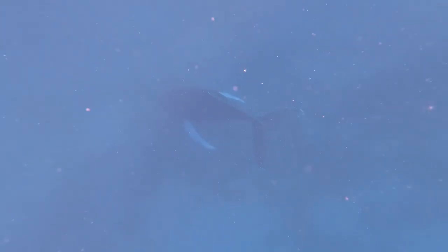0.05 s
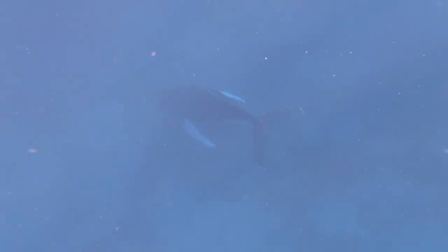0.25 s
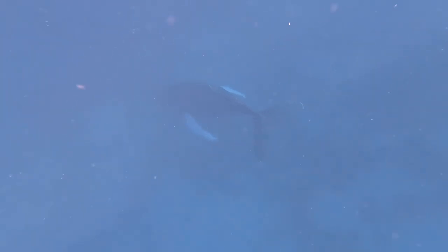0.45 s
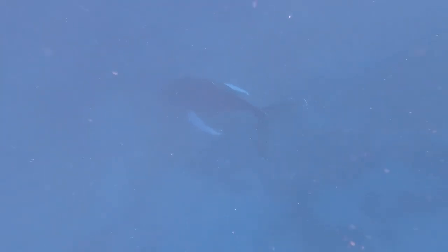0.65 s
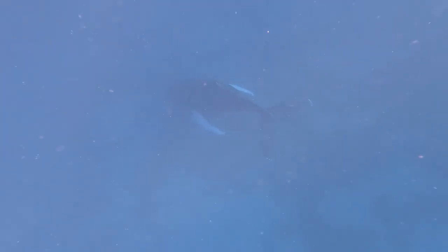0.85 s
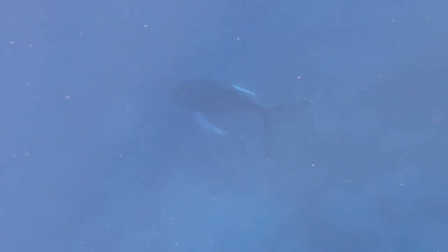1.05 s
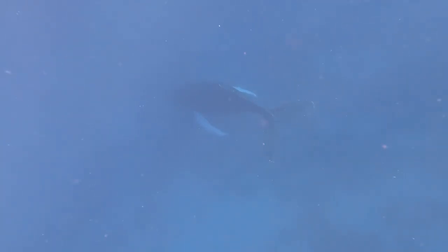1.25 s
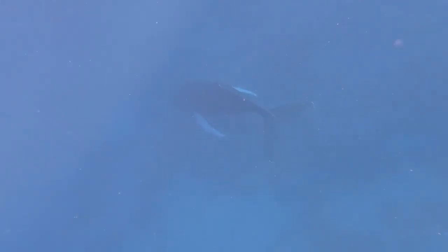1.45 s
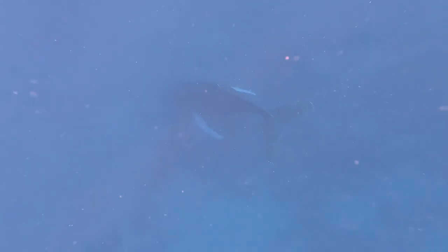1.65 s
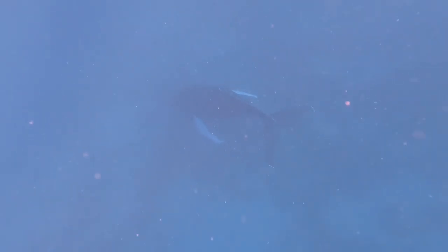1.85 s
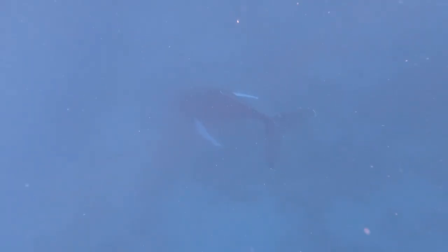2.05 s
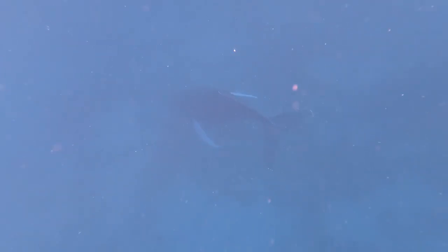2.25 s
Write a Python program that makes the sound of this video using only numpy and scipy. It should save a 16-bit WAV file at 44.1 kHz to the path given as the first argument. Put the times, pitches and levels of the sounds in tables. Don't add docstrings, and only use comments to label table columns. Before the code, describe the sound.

A whale's low buzzing moan swells and sags underwater amid bubble pings and soft rumble

```python
import sys
import numpy as np
from scipy import signal
from scipy.io import wavfile
from scipy.ndimage import uniform_filter1d

SR = 44100
rng = np.random.default_rng(int(sys.argv[2]) if len(sys.argv) > 2 else 0)


def to_wav(s):
    ch = np.atleast_2d(s).T
    pcm = np.round(np.clip(ch, -1, 1) * 32767)
    wavfile.write(sys.argv[1], SR, pcm.astype(np.int16))


def volts_from_decibels(level):
    exponent = np.asarray(level, float) / 20
    return 10 ** exponent


N = 101429

# frequency in Hz, width in Hz, level in dB.
HOUSING = [(250, 184, 5.5), (650, 270, -2), (1150, 393, -2.5), (1510, 240, 3.5), (1950, 950, -24),
           (2680, 890, -27.5), (3520, 290, -17.5), (4200, 210, -25.5), (6900, 1500, -57.5)]


def curve(table, col):
    rows = np.array(table)
    return np.interp(np.arange(N) / SR, rows[:, 0], rows[:, col])


def unit(x):
    return x / np.sqrt(np.mean(x ** 2))


def even(x):
    return x / np.sqrt(uniform_filter1d(x ** 2, size=5000) + 1e-12)


def walk(rate):
    k = int(SR / rate)
    steps = np.repeat(rng.standard_normal(N // k + 1), k)
    return unit(uniform_filter1d(uniform_filter1d(steps, k), k)[:N])


def ring(x, hz, width):
    b, a = signal.iirpeak(hz, hz / width / 1.48, fs=SR)
    return signal.lfilter(b, a, signal.lfilter(b, a, x))


def band(x, low_hz, high_hz):
    return signal.sosfilt(signal.butter(4, [low_hz, high_hz], "band", fs=SR, output="sos"), x)


def add(out, s, grain):
    i = int(s * SR)
    out[i:i + len(grain)] += grain[:N - i]


def bubble(db, hz, t60, rise=0., attack=0.00048):
    t = np.arange(int(t60 * SR)) / SR
    cycles = np.cumsum(hz * 2 ** (rise * t)) / SR
    return volts_from_decibels(db - 60 * t / t60) * (1 - np.exp(-t / attack)) * np.sin(2 * np.pi * cycles)


def housing(x):
    return sum(volts_from_decibels(db) * ring(x, hz, w) for hz, w, db in HOUSING)


def wash(surge_db):
    out = np.zeros(N)
    for hz, width, db in HOUSING:
        surge = 0.34 * (hz < 400) * surge_db
        flicker = 2.0 * walk(12) + 0.0004 * hz * walk(25)
        out += volts_from_decibels(db + surge + flicker) * ring(rng.standard_normal(N), hz, width)
    return unit(out)


def fizz():
    per_s, spread_db = 410, 3
    out = np.zeros(N)
    for when, size, level, damping in rng.random((int(per_s * 2.0), 4)):
        hz = 1900 * 2 ** (2.0 * size)
        t60 = (15 + 40 * damping) / hz
        add(out, when * N / SR, bubble(-spread_db * np.log(level + 0.1), hz, t60, 1.7, 0.00057))
    return unit(housing(out))


def crackle():
    chance = 180 * volts_from_decibels(3.3 * walk(15)) / SR
    out = np.zeros(N)
    for hz, width, db in HOUSING[2:]:
        clicks = (rng.random(N) < chance) * rng.standard_normal(N)
        out += volts_from_decibels(db) * ring(clicks, hz, width * 1.19)
    return unit(out)


def sea():
    # time in seconds, level of the noise in dB, surge of the rumble in dB.
    water_course = [(0, -50.5, -2), (.15, -52, -1.5), (.3, -49.5, 0.5), (.52, -43.5, -2.5), (.7, -46.5, 0),
                    (1.0, -52, -2), (1.3, -59.5, -2.5), (1.45, -51, 3), (1.8, -55, 4), (1.95, -50.5, -5),
                    (2.05, -46.5, -12.5), (2.2, -53, -1), (2.3, -47, 8)]
    water_db, surge_db = uniform_filter1d(curve(water_course, 1), 2000), curve(water_course, 2)
    water = volts_from_decibels(13) * wash(surge_db) + volts_from_decibels(9.5) * fizz() + volts_from_decibels(6) * crackle()
    rumble = unit(band(rng.standard_normal(N), 18, 57.5))
    return volts_from_decibels(water_db) * water + volts_from_decibels(-40.5 + surge_db + 3.4 * walk(7.2)) * rumble


def pings():
    # start in seconds, peak in dB, frequency in Hz, decay in seconds.
    small = [(0.016, -22, 916, 0.045), (0.163, -26, 1500, 0.054), (0.205, -10.5, 1610, 0.0083),
             (0.221, -15.5, 1240, 0.04), (0.27, -16.5, 1650, 0.041), (0.288, -15, 1374, 0.02),
             (0.357, -25.5, 1470, 0.02), (0.398, -19.5, 1590, 0.022), (.42, -13, 1700, 0.011),
             (.435, -11.5, 1670, 0.023), (0.451, -17, 1650, 0.03), (.497, -15.5, 1584, 0.044),
             (.506, -18, 1587, .04), (0.513, -10.5, 1600, 0.018), (0.519, -16.5, 1270, 0.031),
             (0.547, -21.5, 1950, 0.026), (0.58, -24.5, 1532, 0.12), (.605, -16, 1547, 0.033),
             (0.644, -15, 2016, 0.031), (0.7, -21.5, 1433, 0.05), (0.76, -26, 1510, 0.056),
             (0.849, -17, 2006, 0.021), (1.659, -26, 1700, 0.037), (.412, -18.5, 1920, 0.032),
             (1.995, -18, 1520, 0.056), (2.014, -16.5, 1200, 0.025), (2.02, -21, 1866, 0.044),
             (2.043, -16.5, 1636, 0.036), (2.053, -22, 1573, 0.033), (2.062, -13.5, 1585, 0.019),
             (2.096, -32.5, 1630, .03), (.093, -27.5, 1600, .04), (1.76, -31, 1990, 0.021),
             (1.943, -28.5, 1950, 0.038), (2.081, -19, 1623, 0.03), (0.466, -15.5, 1500, 0.01),
             (2.274, -25, 1690, 0.018)]
    out, ticks = np.zeros((2, N))
    for s, db, hz, t60 in small:
        add(out, s, bubble(db + 4, hz, t60, 3.5, 0.0012))
        add(out, s, bubble(db - 5.0, hz * 1.13, t60 * 0.9))
        add(ticks, s, volts_from_decibels(db) * rng.standard_normal(180) * np.hanning(180))
    return out + volts_from_decibels(-1) * housing(ring(ticks, 2900, 2700))


def glints():
    # start in seconds, peak in dB, frequency in Hz.
    grains = [(0.2044, -30, 3360), (0.2796, -38, 3650), (0.2942, -34, 3830), (0.3713, -33.5, 3710),
              (0.4394, -34.5, 3640), (0.4798, -34, 3400), (0.5072, -26, 3600), (0.533, -26, 3300),
              (0.6517, -37.5, 3840), (0.7836, -42, 3630), (1.0705, -33.5, 3500), (1.218, -40.5, 3480),
              (1.4305, -41, 3270), (1.4852, -42, 3460), (1.716, -37, 3621), (1.761, -38, 3450),
              (1.9285, -35, 3500), (1.982, -40.5, 3870), (2.0175, -33.5, 3560), (2.0522, -32, 3360),
              (2.0817, -35, 3570), (2.1096, -40, 3860), (2.1226, -35, 3730), (2.1485, -40, 3680),
              (2.2284, -42, 3560), (2.2636, -35, 3500)]
    # start in seconds, peak in dB, frequency in Hz.
    highest = [(0.0174, -65, 6160), (0.0493, -52, 6600), (0.1012, -62, 6710), (0.2057, -66, 6920),
               (0.314, -54, 6130), (0.3716, -60, 6240), (0.4707, -60, 6340), (0.596, -61, 6640),
               (0.6115, -52, 7010), (0.6783, -58, 7000), (0.7088, -54, 6960), (0.8185, -60, 6110),
               (0.8903, -49.5, 6770), (1.062, -61, 6550), (1.5464, -54, 6970), (1.5982, -56.5, 6760),
               (1.775, -57, 6920), (1.9886, -47.5, 6310)]
    out, snaps = np.zeros((2, N))
    for table, gain_db, cycles in ((grains, 4, 56), (highest, 9, 76)):
        for s, db, hz in table:
            add(out, s, bubble(db + gain_db, hz, cycles / hz, -3.0))
            add(snaps, s, volts_from_decibels(db + 2) * rng.standard_normal(110) * np.hanning(110))
    return out + band(snaps, 2500, 4700)


def specks():
    # start in seconds, peak in dB, frequency in Hz.
    tiny = [(0.2062, -19.5, 2555), (0.282, -32, 2590), (0.373, -35.5, 2580), (0.421, -24.5, 3540),
            (0.514, -20, 2680), (0.5964, -25.5, 2640), (0.6465, -30.5, 2760), (0.7148, -32, 3620),
            (0.7686, -28.5, 2490), (1.5695, -30.5, 2620), (1.8514, -39, 2680), (1.9415, -28, 2960),
            (2.0165, -39, 3090), (2.214, -34, 2780), (2.255, -20.5, 2540)]
    out = np.zeros(N)
    for s, db, hz in tiny:
        add(out, s, bubble(db + 3.5, hz, 62 / hz, -4.0))
    return out


def knocks():
    # start in seconds, peak in dB, frequency in Hz, decay in seconds,
    # rise in octaves per second.
    big = [(0.5144, -12.5, 129, 0.015, -28), (0.362, -24.5, 43.8, 0.028, 1), (0.439, -29.5, 1150, 0.17, 5),
           (1.599, -35.5, 301, 0.096, 10.5), (1.675, -32.5, 374, 0.036, 12), (1.721, -21.5, 310, 0.018, 13),
           (1.766, -13.5, 305, 0.02, 29), (1.827, -25, 322, 0.035, 9), (1.903, -32, 120.3, 0.26, 15.5),
           (1.901, -26.5, 250, 0.095, 1), (1.912, -28, 357, 0.079, -0.5), (2.281, -30, 650, 0.041, 3.5)]
    out = np.zeros(N)
    for s, db, hz, t60, rise in big:
        add(out, s, bubble(db + 8.0, hz, t60, rise, 0.0018))
        add(out, s, bubble(db - 5, hz / 2.3, min(t60 * 3, .13), rise, 0.0043))
    return out


def far_whales():
    # start in seconds, length in seconds, first pitch in Hz, last pitch in Hz,
    # level in dB.
    glides = [(0.213, 0.29, 250, 240.5, -52), (0.417, 0.092, 250, 312, -34.5),
              (0.507, 0.08, 573.5, 702, -32), (0.549, 0.096, 633, 589, -33), (.69, .1, 810, 815, -38.5),
              (1.56, 0.15, 176, 133, -42), (0.663, 0.19, 563, 579, -37.5), (0.79, 0.13, 640, 610, -34.5),
              (1.388, 0.097, 343, 273, -26), (1.514, 0.073, 254.4, 302, -33.5),
              (1.517, 0.069, 720, 732, -40.5), (1.356, 0.067, 675.3, 730.7, -34)]
    out, waver = np.zeros(N), walk(30.99)
    for s, length, from_hz, to_hz, db in glides:
        n = int(length * SR)
        hz = np.linspace(from_hz, to_hz, n) * (1 + .012 * walk(40)[:n])
        swell = np.sqrt(np.hanning(n) * 2)
        add(out, s, volts_from_decibels(db) * swell * np.sin(2 * np.pi * np.cumsum(hz) / SR))
    return out * volts_from_decibels(3 * waver)


def partials(phase, first_db, second_db, buzz_db, rough, bright):
    # multiple of the pitch, level in dB relative to the second partial.
    overtones = [(3, -17.5), (4, -21.5), (5, -27.5), (6, -27.5), (7, -25.5), (8, -25), (9, -24),
                 (10, -24.5), (11, -49.5)]
    t = np.arange(N) / SR
    late_waver = 6.95 * rough * (t > 1.36) * walk(35.25)
    low = volts_from_decibels(first_db) * np.cos(phase) + volts_from_decibels(second_db + late_waver) * np.cos(2 * phase)
    effort = np.minimum(second_db, buzz_db + 2)
    colour = np.interp(bright, [-14, 20, 45], [-4, 0, -12])
    for k, db in overtones:
        level = effort + db + colour * (k > 5) + 8 * rough * walk(19.95)
        low += volts_from_decibels(level) * np.cos(k * phase - 0.81 * k)
    return np.sqrt(2) * low


def throat_buzz(phase, pitch, rough, second, bright):
    # frequency in Hz, width in Hz, level in dB.
    air = [(1055, 170, -1), (1200, 165, -0.5), (1327, 88, 2.5), (1500, 88, 6), (1650, 31, 4.5),
           (2535, 133, -19)]
    second_at = .47
    dull_hz, bright_hz = 1273, 1558
    early = np.roll(phase, -int(.0003 * SR))
    centre = np.interp(bright, [-14, 20], [dull_hz, bright_hz])
    length = 0.00066 * (centre / dull_hz) ** 1.3

    def burst(at, hz):
        s = np.angle(np.exp(1j * (early - 2 * np.pi * at))) / (2 * np.pi * pitch)
        return np.exp(-.5 * (s / length) ** 2) * np.cos(2 * np.pi * (hz + 60000 * s) * s)

    def beat(at):
        return np.exp(0.9 * (np.cos(early - 2 * np.pi * at) - 1))

    weak = burst(second_at + .008 * walk(7), np.minimum(centre + 198, bright_hz))
    pulses = (burst(0, centre) + second * weak) * volts_from_decibels(8 * rough * walk(70))
    beats = beat(0) + second * beat(second_at)
    rings, rasp = np.zeros((2, N))
    for hz, width, db in air:
        rings += volts_from_decibels(db + 5.4 * walk(8.95)) * ring(pulses, hz, width)
        tilt = bright * min(np.log2(hz / 1490), 0)
        tilt = tilt - np.maximum(bright - 22, 0) * .3 * (1550 < hz < 2000)
        rasp += volts_from_decibels(db + tilt) * ring(beats * rng.standard_normal(N), hz, width)
    clean = pulses + volts_from_decibels(-2) * rings
    return np.sqrt(1 - rough) * even(clean) + np.sqrt(rough) * even(rasp)


def breath(first_db, second_db, rough):
    drag = unit(ring(rng.standard_normal(N), 29, 44))
    airy = ring(rng.standard_normal(N), 260, 230) + 0.39 * ring(rng.standard_normal(N), 820, 270)
    return volts_from_decibels(first_db - 7) * drag + volts_from_decibels(second_db - 9.5) * rough * unit(airy)


def whale():
    # time in seconds, pitch in Hz, then levels in dB of the first partial,
    # the second partial and the buzz.
    call = [
        (.57, 75.73, -41.5, -47, -45.5),
        (.66, 77.33, -34.5, -28.5, -37),
        (.83, 77.6, -25, -16.5, -31.5),
        (.87, 78.44, -23.5, -15.5, -19.5),
        (1.1, 84.43, -23, -15.5, -15.5),
        (1.345, 76.3, -18.5, -19.5, -18.5),
        (1.42, 66.1, -23.5, -22, -16.5),
        (1.525, 50.03, -29.5, -22.5, -25),
        (1.585, 47.39, -46.5, -37, -36),
    ]
    # time in seconds, roughness 0-1, second pulse's size 0-1,
    # brightness in dB per octave.
    throat = [
        (.55, .6, .5, 0),
        (.84, .45, .4, -14),
        (.9, .2, .4, -6),
        (1.04, .07, .4, -4),
        (1.13, .05, .7, 14),
        (1.2, .05, .3, 20),
        (1.27, .12, .3, -14),
        (1.38, .45, .55, 14),
        (1.47, .55, .4, 45),
    ]
    t = np.arange(N) / SR
    on = np.clip((t - call[0][0]) / 0.008, 0, 1) * np.clip((call[-1][0] + 0.026 - t) / 0.017, 0, 1)
    first_db, second_db, buzz_db = [curve(call, col) for col in (2, 3, 4)]
    rough, second, bright = [curve(throat, col) for col in (1, 2, 3)]
    pitch = uniform_filter1d(curve(call, 1), size=3500)
    phase = 2 * np.pi * (np.cumsum(pitch) / SR + .015 * rough * walk(50))
    voice = partials(phase, first_db, second_db, buzz_db, rough, bright)
    buzz = volts_from_decibels(buzz_db) * throat_buzz(phase, pitch, rough, second, bright)
    return on * (voice + buzz + breath(first_db, second_db, rough))


def echo(moan):
    t = np.arange(20000) / SR
    tail = rng.standard_normal(len(t)) * volts_from_decibels(-60 * t / .5) * (t > .015)
    return volts_from_decibels(-22) * signal.fftconvolve(moan, tail / np.sqrt(np.sum(tail ** 2)))[:N]


def scene():
    moan = whale()
    bubbles = pings() + glints() + specks() + knocks()
    return (sea() + bubbles + far_whales() + moan + echo(moan))[None, :]


def low_pass(x):
    return signal.sosfilt(signal.butter(12, 14450, fs=SR, output="sos"), x)


def record(dry):
    # frequency in Hz, width in Hz.
    notches = [(2300, 550), (5500, 5830)]
    for hz, width in notches:
        dry = 0.88 * signal.lfilter(*signal.iirnotch(hz, hz / width, fs=SR), dry) + 0.19 * dry
    dull = signal.sosfilt(signal.butter(10, 7700, fs=SR, output="sos"), dry)
    return low_pass(dull + volts_from_decibels(-101) * rng.standard_normal(dry.shape))


dry = scene()
out = record(dry)
to_wav(out)
```